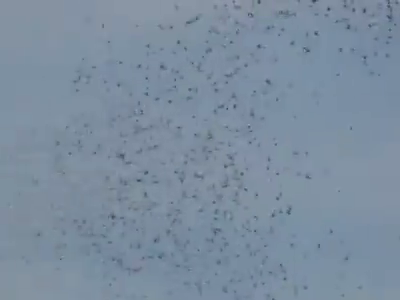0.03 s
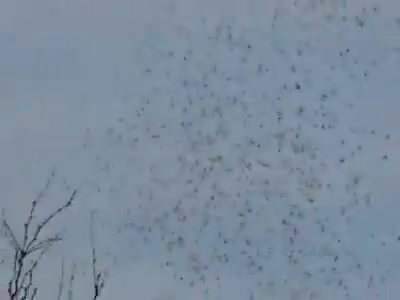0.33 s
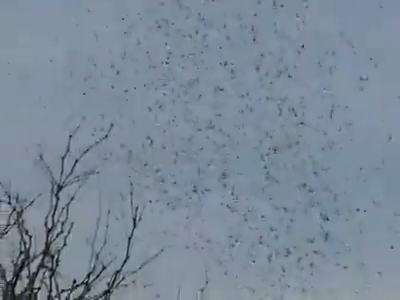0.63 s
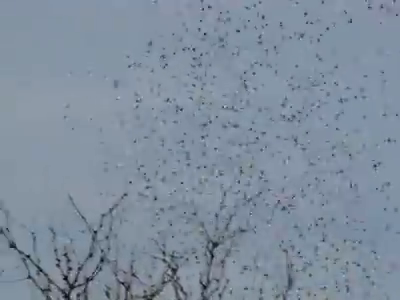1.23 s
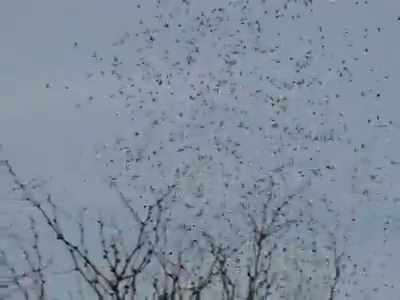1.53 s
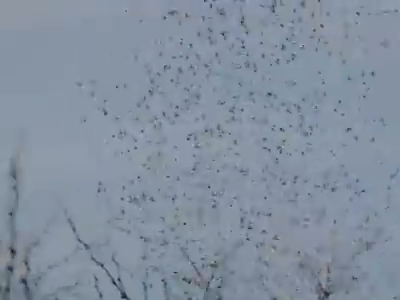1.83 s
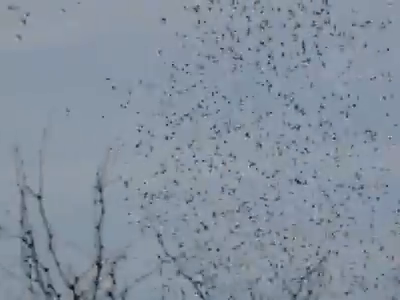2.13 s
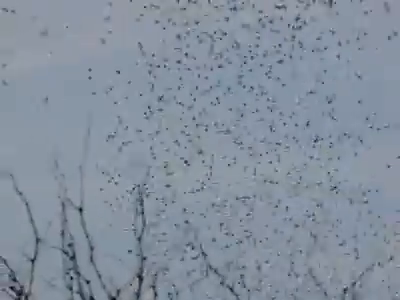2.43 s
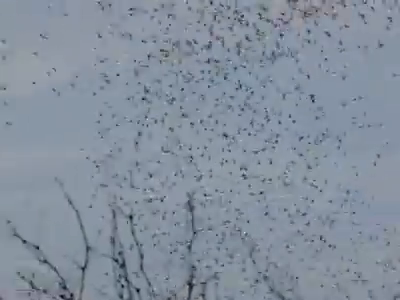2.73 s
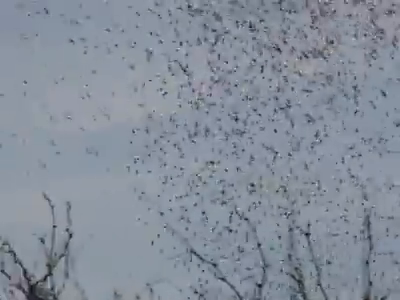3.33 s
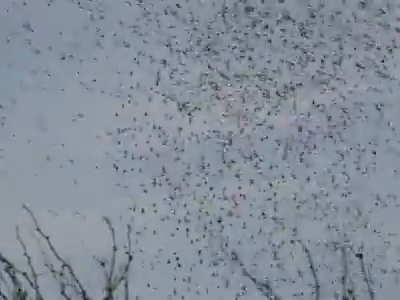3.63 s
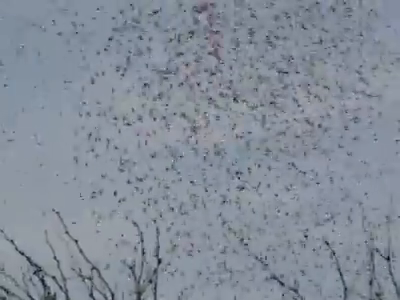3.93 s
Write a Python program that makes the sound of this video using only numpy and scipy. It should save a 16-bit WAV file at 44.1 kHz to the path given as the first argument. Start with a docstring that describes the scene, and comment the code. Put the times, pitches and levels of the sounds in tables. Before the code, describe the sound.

A huge flock of small birds flies overhead, its wingbeats blending into a soft, steady rush above a low outdoor rumble. Faint handling ticks and small knocks come near 0.5 s. From about 2 s, wind buffets the microphone in uneven, low gusts. The flock turns with a deeper whoosh peaking near 2.9 s, then fades under the strongest wind, with a few faint ticks before 4 s.

```python
"""A huge flock of small birds wheels overhead, its countless wingbeats summing incoherently to a rush
above a distant outdoor rumble. Near 0.5 s the hand-held camera ticks faintly and knocks excite the modes
of its case. From 2 s the wind rises, its turbulent pressure buffeting the two microphone ports in turn.
The flock turns with a deeper whoosh that peaks near 2.9 s. Then the rush fades under the strongest
wind, and the grip gives a few more faint ticks."""
import sys
import numpy as np
from scipy import signal
from scipy.fft import rfft, irfft, next_fast_len
from scipy.io import wavfile
from scipy.ndimage import uniform_filter1d, map_coordinates

SR = 44100
rng = np.random.default_rng(int(sys.argv[2]) if len(sys.argv) > 2 else 0)


def master(y):
    """Save y as 16-bit WAV."""
    cut = np.clip(np.atleast_2d(y).T, -1, 1)
    pcm = np.round(cut * 32767)  # scale
    wavfile.write(sys.argv[1], SR, pcm.astype(np.int16))


N = 176400


def amp(db):
    """The decibel law: 20 dB is a factor of ten in amplitude."""
    return 10 ** (np.asarray(db) / 20)


def unit(x):
    """Normalisation of each channel to rms 1."""
    return x / np.sqrt(np.mean(x ** 2, axis=-1, keepdims=True) + 1e-20)


def along(points, hz):
    """Interpolation of (frequency, value) points on a logarithmic frequency axis."""
    freqs, values = np.transpose(points)
    return np.interp(np.log(hz + 1), np.log(freqs + 1), values)


def curves(rows):
    """Linear interpolation in time: one envelope for each column after the first."""
    times, *columns = np.transpose(rows)
    return [np.interp(np.arange(N) / SR, times, column) for column in columns]


def wobble(knots_per_s):
    """Slow random modulation: a spline through Gaussian values."""
    return map_coordinates(rng.standard_normal(1024), [np.arange(N) * knots_per_s / SR], mode="wrap")


def filtered(x, response):
    """Linear filtering: the spectrum of x is multiplied by a frequency response."""
    size = next_fast_len(N + SR // 2)
    return irfft(rfft(x, size) * response(np.fft.rfftfreq(size, 1 / SR)), size)[..., :N]


def pan(db):
    """An interchannel level difference, split evenly into left and right gains."""
    return amp(np.array([[db], [-db]]) / 2)


def diffuse_noise(spectrum, coherence, patchy_db):
    """Partially coherent stereo noise of rms 1: the balance of mid and side sets the coherence."""
    cells = signal.stft(rng.standard_normal((2, N)), nperseg=512)[2]
    patches = uniform_filter1d(rng.standard_normal(cells.shape[1:]), size=5, axis=0)  # across frequency
    patches = uniform_filter1d(patches, size=8, axis=1)  # across time
    pair = signal.istft(cells * amp(patchy_db * unit(patches)), nperseg=512)[1][:, :N]

    def mid_side_gains(hz):
        angle = np.arccos(np.clip(along(coherence, hz), -1, 1)) / 2
        return amp(along(spectrum, hz)) * [np.cos(angle), np.sin(angle)]

    mid, side = filtered(pair, mid_side_gains)
    return unit(np.array([mid + side, mid - side]))


def flock():
    """Incoherent summation: wingbeats merge into a fluttering body, a hiss and the whoosh of a turn."""
    # envelopes of the rush of wings (time [s], body level [dB], hiss level [dB])
    rush_levels = [(0, -36.5, -47.5), (.7, -35.5, -47.5), (1.1, -36.5, -47.5), (1.65, -38, -47.5),
                   (2.05, -38, -48.5), (2.4, -39.5, -48), (3.0, -40, -48.5), (3.35, -40.5, -49.5),
                   (3.5, -44, -51), (3.8, -45.5, -53), (4, -46.5, -58)]
    # envelope of the whoosh (time [s], level [dB])
    whoosh_levels = [(0, -70), (1.9, -69), (2.3, -42.5), (2.48, -44.5), (2.64, -36.5), (2.87, -33),
                     (3.1, -36.5), (3.19, -45.5), (3.45, -62.5), (4, -61.5)]
    # spectra of the three parts (frequency [Hz], relative spectral density [dB])
    body_spectrum = [(100, -16.5), (200, -2.5), (310, -4), (400, -6), (510, -2), (620, 0), (760, -3.5),
                     (900, -4), (1130, -7), (1380, -6), (1650, -10), (2050, -12), (2900, -16), (4500, -23),
                     (9000, -45)]
    hiss_spectrum = [(1000, -12), (2200, -1.5), (3300, -3), (4300, -2.5), (5500, -6), (7000, -11.5),
                     (8500, -17.5), (10200, -29)]
    whoosh_spectrum = [(200, -17), (400, -9.5), (500, 0), (620, -0.5), (760, -3.5), (920, -4), (1150, -11),
                       (1600, -12), (2400, -25.5), (5000, -51.5)]
    # likeness of the sound at the two ports (frequency [Hz], coherence [0-1])
    rush_coherence = [(100, 1), (250, 1), (600, 0.97), (1000, .91), (1800, .78), (3100, 0.54), (5500, 0.56),
                      (9600, 0.11)]
    whoosh_coherence = [(400, 1), (800, 1), (1600, 0.98)]
    # the flock's lean to the left (frequency [Hz], left minus right [dB])
    left_lead = [(300, 1), (1100, 0.5), (1800, 3), (2800, 3), (4500, 0.4), (9000, -0.5)]
    body_db, hiss_db = curves(rush_levels)
    whoosh_db, = curves(whoosh_levels)
    flutter_db = 0.16 * wobble(24.47)
    body = amp(body_db + flutter_db) * diffuse_noise(body_spectrum, rush_coherence, patchy_db=1.0)
    hiss = amp(hiss_db) * diffuse_noise(hiss_spectrum, rush_coherence, patchy_db=1.3)
    whoosh = amp(whoosh_db) * diffuse_noise(whoosh_spectrum, whoosh_coherence, patchy_db=1.8)
    return filtered(body + hiss + whoosh, lambda hz: amp(np.outer([1, -1], along(left_lead, hz)) / 2))


def eddies(spectrum, lumpy_db):
    """Turbulent pressure, uncorrelated at the two ports: steady in the mean, with quick lumps."""
    pressure = filtered(rng.standard_normal((2, N)), lambda hz: amp(along(spectrum, hz)))
    local_power = uniform_filter1d(uniform_filter1d(pressure ** 2, size=3000), size=3000)
    steady = pressure / np.sqrt(np.abs(local_power) + 1e-20)
    lumps = amp(lumpy_db * np.array([wobble(24), wobble(24.07)]))
    return unit(steady * lumps)


def wind():
    """Buffeting follows power laws of wind strength; quick eddies grow faster, so it also brightens."""
    # steady flow at each port (time [s], strength [dB])
    flow_left = [(0, -31.5), (.35, -34), (.65, -35.5), (1.05, -32.5), (1.4, -38.5), (1.65, -32),
                 (1.85, -31), (2.05, -24.5), (2.48, -34), (2.75, -26.5), (3.0, -19), (3.25, -17),
                 (3.42, -13), (3.56, -16.5), (3.7, -13.5), (3.86, -18), (4, -15.5)]
    flow_right = [(0, -41), (.7, -40.5), (1.1, -34.5), (1.45, -36.5), (1.72, -34), (1.86, -41),
                  (2.15, -29.5), (2.35, -25.5), (2.55, -27), (2.77, -28.5), (2.9, -27.5), (3.22, -35),
                  (3.42, -31), (3.68, -41.5), (3.8, -24), (4, -16.5)]
    # gusts on one port (time [s], strength [dB], half-width [s], brightness [dB], port [L or R])
    gusts = [(.02, -22.5, 0.024, -7.5, "L"), (.44, -24.5, 0.012, -4, "L"), (1.66, -18.5, 0.043, -19, "L"),
             (1.75, -14.5, 0.049, -15, "L"), (1.929, -17.5, 0.021, -10.5, "L"),
             (2.025, -18.5, 0.03, 2, "L"), (2.112, -16.5, 0.021, 3, "L"), (2.207, -7, .018, -12, "L"),
             (2.34, -21, 0.043, -6, "L"), (2.43, -17, 0.022, 4, "R"), (2.515, -20, 0.034, 5, "R"),
             (2.57, -18, 0.044, -6.5, "L"), (2.583, -18, 0.04, 10, "R"), (2.691, -13.5, 0.022, -3, "R"),
             (2.825, -10, 0.011, -12.5, "L"), (2.90, -14, 0.013, -0.5, "L"), (2.99, -17, 0.033, -7, "R"),
             (3.02, -16, .02, -10, "L"), (3.082, -14.5, 0.011, -8, "R"), (3.10, -14.5, 0.026, 4.5, "L"),
             (3.19, -19.5, 0.015, 5, "L"), (3.30, -31.5, 0.022, 9, "R"), (3.333, -11, 0.011, -2.5, "L"),
             (3.47, -15, 0.045, 2.5, "L"), (3.656, -18, 0.032, 6, "L"), (3.72, -16, 0.018, 1.5, "L"),
             (3.80, -10.5, 0.006, 4, "L"), (3.92, -13.5, 0.03, -1, "R"), (3.953, -17.5, 0.031, 4.5, "L")]
    # pressure spectra of the eddies (frequency [Hz], relative spectral density [dB])
    slow_spectrum = [(3, -39), (11, -8), (20, 1.5), (40, -3.5), (65, -2), (110, -6), (150, -20.5),
                     (220, -40.5), (400, -45), (1200, -95)]
    quick_spectrum = [(30, -17.5), (70, -3.5), (125, -1), (180, -6.5), (260, -15.5), (380, -26.5),
                      (700, -48), (2000, -53), (6000, -86)]
    strong_wind_db, slow_db, quick_db = -15, -15, -18.5  # reference strength and the eddy levels there
    slow_exponent, quick_exponent = 0.91, 1.7  # dB per dB of wind strength
    t = np.arange(N) / SR
    slow_power = amp(np.array(curves(flow_left) + curves(flow_right)) - strong_wind_db) ** 2
    quick_power = slow_power.copy()
    for peak_s, db, width_s, bright_db, port in gusts:
        channel = "LR".index(port)
        gust = amp(db - strong_wind_db) ** 2 * np.exp(-((t - peak_s) / width_s) ** 2)
        slow_power[channel] += gust
        quick_power[channel] += gust * amp(bright_db) ** (2 / quick_exponent)
    slow = amp(slow_db) * np.sqrt(slow_power) ** slow_exponent * eddies(slow_spectrum, lumpy_db=1.54)
    quick = amp(quick_db) * np.sqrt(quick_power) ** quick_exponent * eddies(quick_spectrum, lumpy_db=0.34)
    return slow + quick


def knocks():
    """Modal vibration: each soft contact rings the camera's case as a sum of damped sinusoids."""
    # contacts on the case (time [s], level [dB], left minus right [dB])
    contacts = [(.4798, -21, 8), (0.4833, -22.5, -2), (0.4852, -10, 14), (0.4857, -20, -23),
                (.4866, -19.5, -2), (.5606, -22, -4), (0.5617, -14, 10), (0.5635, -25, 15),
                (.5660, -13.5, -6)]
    # modes of the case (frequency [Hz], relative level [dB], 60 dB decay time [s])
    case_modes = [(1010, -4, 0.0098), (1348, 1, 0.0092), (1746, -6, 0.0077), (2800, -18.5, 0.0053)]
    rise_s = 0.00045
    out = np.zeros((2, N))
    t = np.arange(SR // 20) / SR
    rise = 1 - np.exp(-(t / rise_s) ** 2)
    for onset_s, db, side_db in contacts:
        ring = sum(amp(mode_db + rng.standard_normal() - 60 * t / t60) * np.sin(2 * np.pi * hz * t)
                   for hz, mode_db, t60 in case_modes)
        start = round(onset_s * SR)
        out[:, start:start + len(t)] += pan(side_db) * amp(db) * ring * rise
    return out


def ticks():
    """Friction noise: each tiny scrape of the grip is a decaying burst shaped by a broad resonance."""
    # scrapes of the grip (time [s], level [dB], left minus right [dB], resonance [Hz])
    scrapes = [(0.28, -37.5, 2.5, 4800), (.306, -35, -1, 2830), (0.427, -33.5, 3, 4050),
               (0.479, -38.5, 2, 4440), (0.5584, -37, -2.5, 5830), (0.561, -31.5, 9, 2900),
               (3.378, -41.5, 7, 3440), (3.759, -47, 6, 3380), (3.888, -42.5, 14.5, 3370)]
    rise_s, t60_s, q = 0.001, 0.02, 3.1  # q of each of two band-pass stages in cascade
    out = np.zeros((2, N))
    for onset_s, db, side_db, centre_hz in scrapes:
        def resonance(hz):
            return (hz * centre_hz / (hz * centre_hz + 1j * q * (hz ** 2 - centre_hz ** 2))) ** 2

        t = np.maximum(np.arange(N) / SR - onset_s, 0)
        envelope = amp(db - 60 * t / t60_s) * (1 - np.exp(-t / rise_s))
        out += pan(side_db) * envelope * unit(filtered(rng.standard_normal(N), resonance))
    return out


def rumble():
    """Ambient noise: a steady, distant low-frequency field, partly coherent at the two ports."""
    # spectrum of the outdoor rumble (frequency [Hz], relative spectral density [dB])
    spectrum = [(20, 7.5), (60, 5), (98, -6), (115, 5.5), (138, -1.5), (200, -10.5), (300, -8), (600, -41)]
    # its likeness at the two ports (frequency [Hz], coherence [0-1])
    coherence = [(60, 0.54), (115, 1), (200, 1), (350, 0.54)]
    return amp(-39.5) * diffuse_noise(spectrum, coherence, patchy_db=0.5)


def scene():
    """Superposition: the flock and far rumble add to wind and handling right at the microphone."""
    return flock() + rumble() + wind() + knocks() + ticks()


def record(dry):
    """Soft saturation in the camera rounds off the strongest gusts; a low-pass limits the bandwidth."""
    ceiling_db, top_hz = -1.5, 10280
    rounded = dry / (1 + (dry / amp(ceiling_db)) ** 6) ** (1 / 6)
    return filtered(rounded, lambda hz: hz < top_hz)


dry = scene()
out = record(dry)
master(out)
```